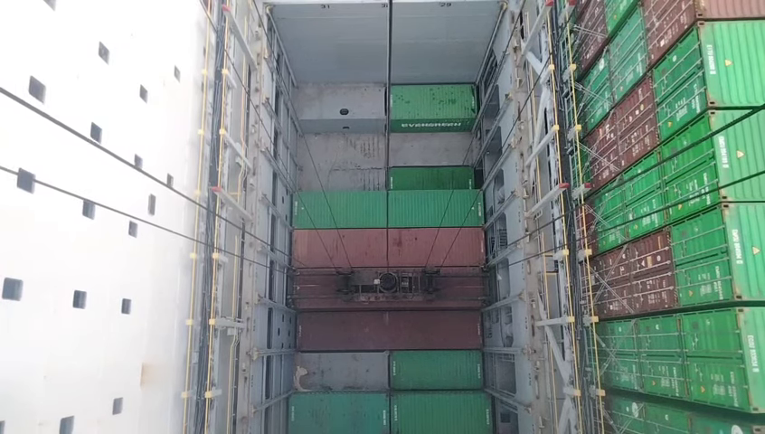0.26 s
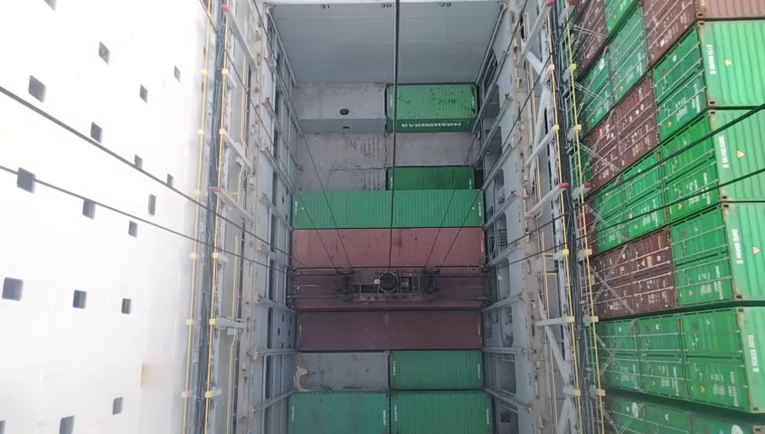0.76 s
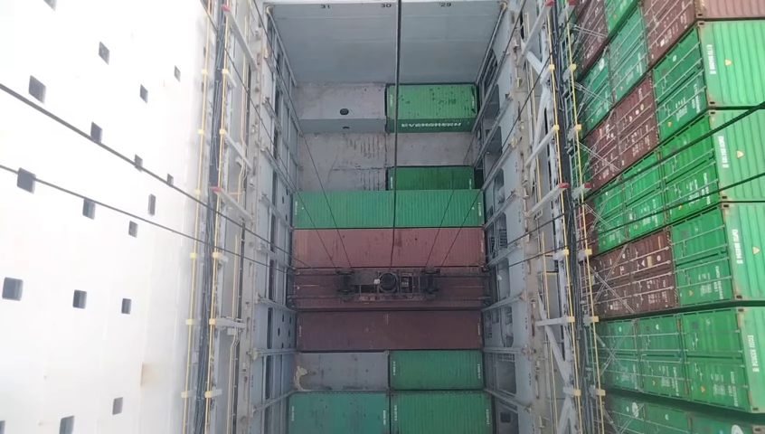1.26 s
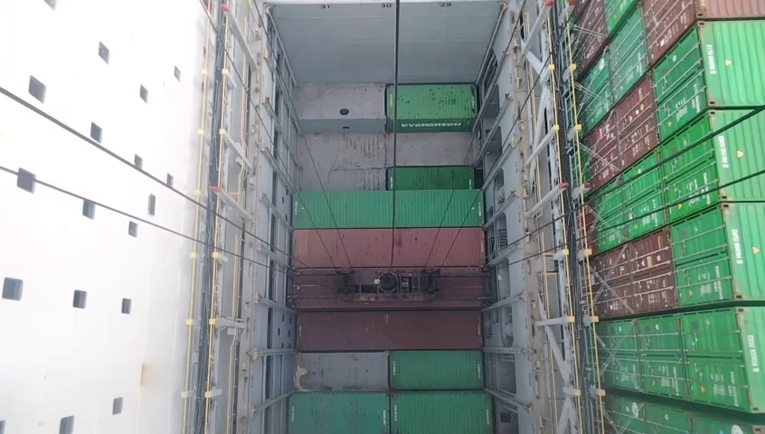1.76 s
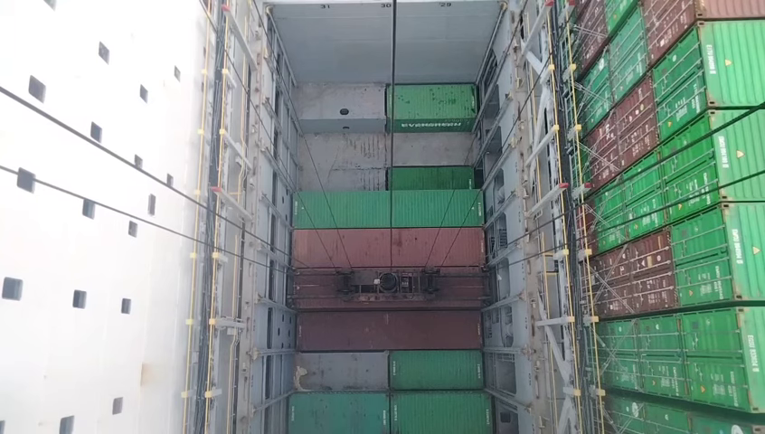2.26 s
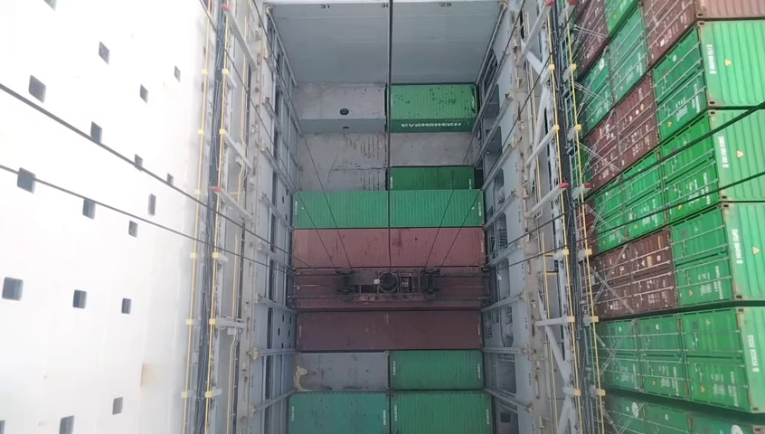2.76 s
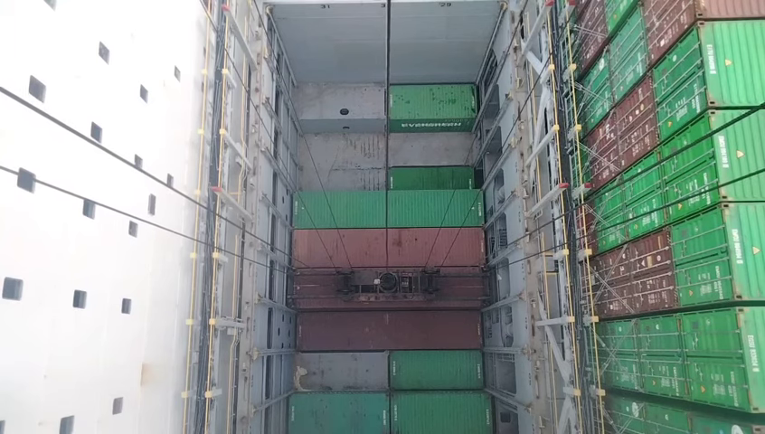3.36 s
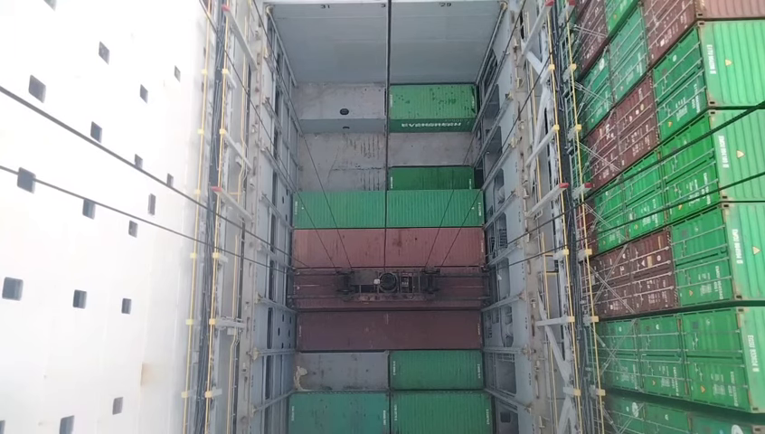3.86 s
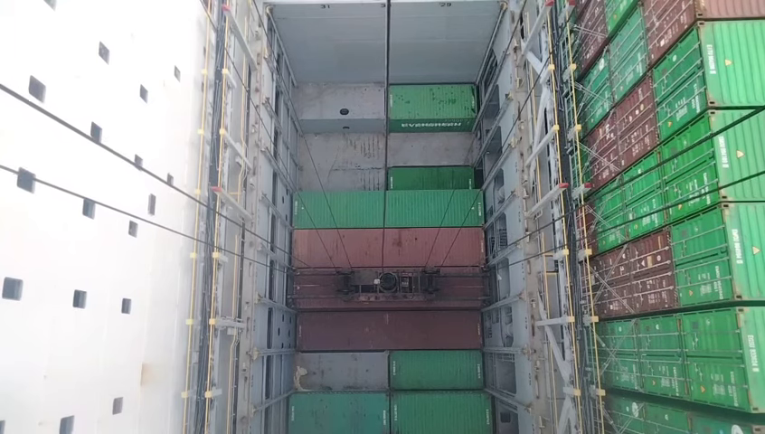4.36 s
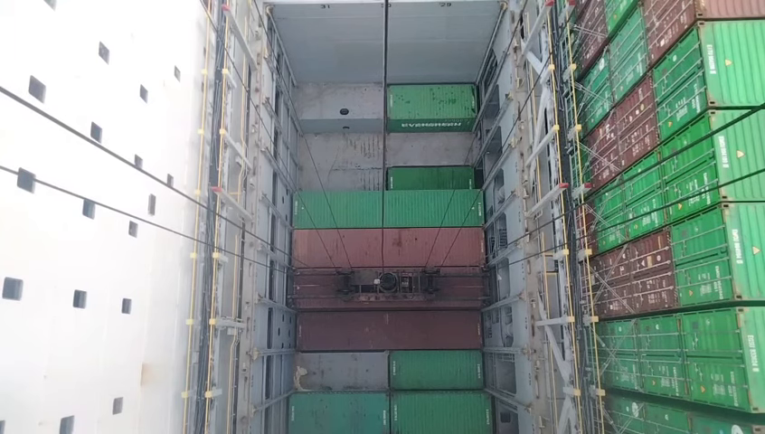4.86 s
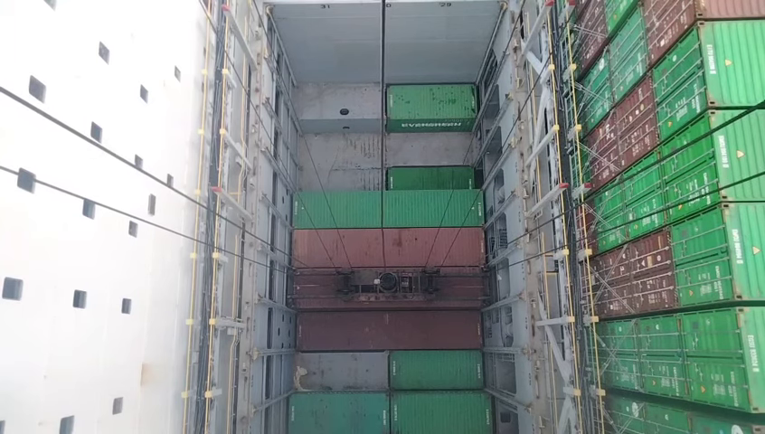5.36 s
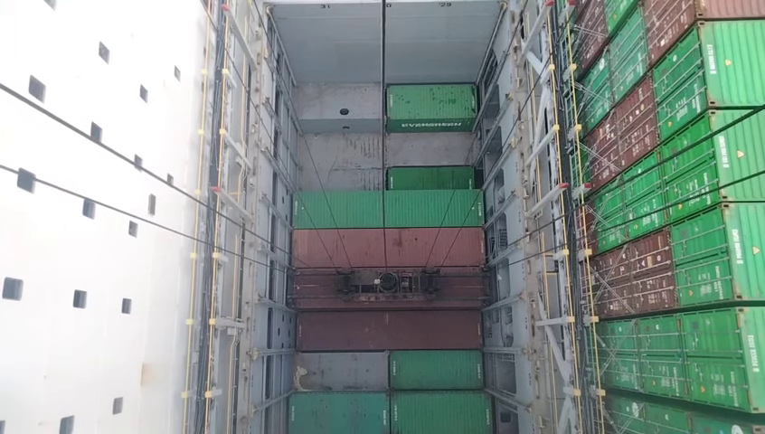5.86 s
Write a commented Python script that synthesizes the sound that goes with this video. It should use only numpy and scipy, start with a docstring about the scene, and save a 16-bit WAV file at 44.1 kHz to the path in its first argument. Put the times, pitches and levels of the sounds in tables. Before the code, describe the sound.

Inside a container crane's cab, a low throbbing machinery hum and rushing air continue while hoisting gear clacks in sharp metallic bursts and slams.

```python
"""A deep throb through the floor, a beating hum, a drive's whine and rushing air fill a container crane's cab.
Wavering sine tones make the machinery; coloured noise makes the air and the rumble.
Then the hoisting gear clacks in bursts: mostly a bright metal snap and then a duller knock of the housing,
with a few light pings and soft thumps between, and a catch that slams home. Each blow is a short chatter
of noise, shaped by the part that is struck; the small hard cab rings briefly after it."""
import sys
import numpy as np
from scipy import signal
from scipy.fft import rfft, irfft
from scipy.io import wavfile
from scipy.ndimage import uniform_filter1d

SR = 44100
rng = np.random.default_rng(int(sys.argv[2]) if len(sys.argv) > 2 else 0)


def generate_wav(sig):
    """Save sig (samples, or channels by samples) to the path in sys.argv[1] as 16-bit PCM at SR."""
    pcm = np.round(np.clip(np.atleast_2d(sig).T, -1, 1) * 32767).astype(np.int16)
    wavfile.write(sys.argv[1], SR, pcm)


N = 269892  # length of the scene in samples


def undb(db):
    """Turn decibels into a gain."""
    return 10 ** (np.asarray(db) / 20)


def unit(x):
    """Scale to rms 1."""
    return x / np.sqrt(np.mean(x ** 2))


def level_curve(rows):
    """Read a table of [t/s, level/dB] at every sample, with straight lines between the rows."""
    t, level_db = np.transpose(rows)
    return np.interp(np.arange(N) / SR, t, level_db)


def colour_db(points, hz):
    """Read a table of [f/Hz, level/dB] on a log-frequency axis."""
    f, db = np.transpose(points)
    return np.interp(np.log(hz + 1), np.log(f), db)


def walk(rate):
    """Drift at random: draw 'rate' levels a second, smooth the steps twice and scale to rms 1."""
    hold = int(SR / rate)
    steps = np.repeat(rng.standard_normal(N // hold + 1), hold)
    smooth = uniform_filter1d(uniform_filter1d(steps, hold), hold)
    return unit(smooth[:N])


def wavering_phase(hz, wander_hz):
    """Add up a speed that drifts around hz, from a random starting angle in radians."""
    turns = np.cumsum(hz + wander_hz * walk(9)) / SR
    return 2 * np.pi * (turns + rng.random())


def tone(hz, wander_hz, flutter_db):
    """A machine tone is a sine whose speed and strength waver; rms 1."""
    wave = np.sin(wavering_phase(hz, wander_hz))
    return unit(wave * undb(flutter_db * walk(12)))


def noise(points):
    """Noise takes its colour from a table that weights its spectrum; rms 1."""
    hz = np.fft.rfftfreq(N, 1 / SR)
    white = rfft(rng.standard_normal(N))
    return unit(irfft(white * undb(colour_db(points, hz)), N))


# Rush of air, relative colour: [f/Hz, level/dB per Hz]
AIR_COLOUR = [(150, -7), (330, 1), (600, -5.5), (850, -5), (1150, -10.5), (1450, -11), (1720, -11.5),
              (2050, -17.5), (3200, -25.5), (4500, -33.5), (7500, -33.5), (9300, -40), (11500, -45),
              (16000, -43)]
# Rumble of the steel structure, relative colour: [f/Hz, level/dB per Hz]
RUMBLE_COLOUR = [(10, -12), (32, -25), (55, 8), (76, -0.5), (115, 5.5), (140, -3), (240, -3.5), (300, -13),
                 (450, -22), (2000, -68)]


def ventilation():
    """Turbulent air is noise that wavers a little, over the low rumble of the steel structure."""
    rush = noise(AIR_COLOUR) * undb(-45.8 + 0.6 * walk(2.46) + 0.051 * walk(44))
    rumble = noise(RUMBLE_COLOUR) * undb(-45.0 + 0.17 * walk(3.75))
    return rush + rumble


# Weaker tones of motors and fans: [f/Hz, level/dB]
SMALL_TONES = [(22.4, -41.5), (29.6, -47.5), (45, -49.5), (90.2, -50), (102.5, -57.5), (119.5, -54),
               (164.5, -55.5), (179.3, -54), (200, -59), (224, -56), (239, -51), (308, -61.5), (358, -59.5),
               (402, -62.5), (454, -58), (726, -59.5), (5109, -86.5)]


def small_machines():
    """Each smaller motor or fan adds one wavering tone; higher tones wander by more Hz."""
    return sum(undb(db) * tone(hz, wander_hz=0.00307 * hz, flutter_db=1.66) for hz, db in SMALL_TONES)


SHUDDER_HZ = 24.2
# Throb of the floor, before a small trim: [t/s, level/dB]
SHUDDER_LEVEL = [(0.08, -35), (0.44, -43), (0.96, -32.5), (1.52, -43.5), (1.72, -38), (1.88, -47.5),
                 (2.16, -35.0), (2.68, -41.5), (2.88, -32.5), (3.72, -51), (4.12, -31.5), (4.68, -43),
                 (4.88, -31), (5.12, -43.5), (5.4, -35), (5.64, -50), (5.76, -42), (6.0, -35)]


def floor_shudder():
    """The floor shakes as a very low tone that swells and sinks."""
    level = undb(level_curve(SHUDDER_LEVEL) - 0.5)
    return level * tone(SHUDDER_HZ, wander_hz=0.52, flutter_db=-0.5)


# At LULL_S the two motors pull exactly against each other
HUM_HZ, HUM_DB, BEAT_HZ, LULL_S = 75.8, -40.5, 1.6, 0.36
# Second motor, which eases off and slowly comes back: [t/s, level/dB]
TWIN_LEVEL = [(0, -36.5), (.6, -37.5), (1.3, -38), (1.6, -61), (2.9, -52), (3.5, -49.5), (6.1, -42.5)]


def motor_hum():
    """Two motors hum, and the slightly slower twin beats against the first."""
    phase = wavering_phase(HUM_HZ, wander_hz=0.17)
    slip = 2 * np.pi * BEAT_HZ * (np.arange(N) / SR - LULL_S)
    first = undb(HUM_DB) * np.sin(phase)
    twin = undb(level_curve(TWIN_LEVEL)) * np.sin(phase - slip)
    return np.sqrt(2) * (first - twin)  # the root turns rms levels into peak levels


WHINE_HZ = 822.4
# Whine of the drive, before a trim: [t/s, level/dB]
WHINE_LEVEL = [(0, -74), (.95, -50.5), (2.3, -50.5), (3, -48.5), (4.9, -59.5), (6.1, -54)]


def drive_whine():
    """The drive sings one wavering tone that grows and fades."""
    level = undb(level_curve(WHINE_LEVEL) - 2.5)
    return level * tone(WHINE_HZ, wander_hz=1.6, flutter_db=1.0)


# Time for 60 dB of decay: bass and treble of the tail, and first reflections
LOW_T60_S, HIGH_T60_S, EARLY_T60_S = 0.23, 0.27, 0.11
# Pace at which the tail builds up, and level of the first reflections against the tail
BUILD_S, EARLY_DB = 0.006, 1


def cab(x, wet_db):
    """Close glass and steel walls give first reflections and a short dense tail, drawn anew for each blow."""
    t = np.arange(SR // 4) / SR

    def decay(t60):
        return np.exp(-np.log(1000) * t / t60)

    echoes = rng.standard_normal(len(t)) * np.clip(t / BUILD_S - .3, 0, 1)
    low = signal.lfilter(*signal.butter(1, 4000, fs=SR), echoes)
    tail = low * decay(LOW_T60_S) + (echoes - low) * decay(HIGH_T60_S)
    early = rng.standard_normal(len(t)) * decay(EARLY_T60_S)
    walls = undb(wet_db) * (unit(tail) + undb(EARLY_DB) * unit(early)) / np.sqrt(len(t))
    return signal.fftconvolve(x, signal.unit_impulse(len(t)) + walls)


def response(points, tilt_db, focus_hz, focus_db, size=2048):
    """A struck part colours the blow without delay; the spot that is hit favours one broad resonance."""
    hz = np.fft.rfftfreq(size, 1 / SR)
    resonance = focus_db * np.exp(-(np.log2((hz + 1) / focus_hz) / 0.2) ** 2)
    tilt = tilt_db * np.log2(np.maximum(hz, 1000) / SR)  # flat below 1 kHz
    # folding the cepstrum makes the response start at once (minimum phase)
    cepstrum = irfft(np.log(undb(colour_db(points, hz) + tilt + resonance)))
    cepstrum[1:size // 2] *= 2
    cepstrum[size // 2 + 1:] = 0
    return irfft(np.exp(rfft(cepstrum)))


def blows(table, colour, grit, focus_db, wet_db):
    """Each blow is a chatter of tiny contacts that swells and dies; grit makes the contacts more uneven."""
    out, t = np.zeros(N + SR), np.arange(SR // 5) / SR
    for s, db, rise_ms, tilt_db, focus_hz in table:
        age = t / (max(rise_ms, .2) / 1000)
        swell = age * np.exp(-age)
        strengths = np.exp(grit * rng.standard_normal(len(t)))
        contacts = rfft(rng.standard_normal(len(t)) * strengths * swell ** 2)
        # hard contacts push all frequencies nearly alike; most colour comes from the struck part
        evened = irfft(contacts / np.sqrt(np.abs(contacts) + 1e-12))
        force = evened * swell ** .25
        blow = signal.fftconvolve(force, response(colour, tilt_db, focus_hz, focus_db))
        # here db is the energy spread over a hundredth of a second, before the cab adds to it
        blow = undb(db) * blow * np.sqrt(SR / 100 / np.sum(blow ** 2))
        heard, start = cab(blow, wet_db), int(s * SR)
        out[start:start + len(heard)] += heard
    return out[:N]


def ringing(x, modes):
    """A struck part rings on at its own frequencies: a longer ring is a narrower resonance."""
    ring = 0
    for hz, t60, db in modes:
        width = np.log(1000) / (np.pi * t60)  # Hz
        ring = ring + undb(db) * signal.lfilter(*signal.iirpeak(hz, hz / width, fs=SR), x)
    return x + ring


# Colour of a small steel part: [f/Hz, level/dB per Hz]
PING_COLOUR = [(500, -4), (2500, -5), (5500, -13), (7200, -7), (7900, -8), (8500, -13), (9300, -21),
               (16000, -20)]
# Light pings: [t/s, level/dB, rise time/ms, tilt/dB per octave, favoured f/Hz]
PING_TIMES = [(2.359, -57.5, 3.4, 0, 7800), (2.835, -47.5, 4.1, -0.5, 7200)]


def pings():
    """A small steel part is struck lightly and answers high."""
    return blows(PING_TIMES, PING_COLOUR, grit=0.17, focus_db=6, wet_db=-3.0)


# Colour of the frame: [f/Hz, level/dB per Hz]
THUMP_COLOUR = [(40, 6), (100, 5), (160, -6), (300, 4.5), (550, -8), (1100, -5.5), (2200, -17.5),
                (3000, -21.5), (8000, -31), (16000, -61)]
# Soft thumps, before a trim: [t/s, level/dB, rise time/ms, tilt/dB per octave, favoured f/Hz]
THUMP_TIMES = [(3.505, -25.5, 17.7, -2, 153), (6.055, -29, 46, 1, 2480)]


def thumps(shakes):
    """The frame thumps softly by itself and also shakes with every clack."""
    rows = list(THUMP_TIMES) + shakes
    return undb(-3.0) * blows(rows, THUMP_COLOUR, grit=.1, focus_db=8.5, wet_db=-2.0)


# Colour of a knock, for the catch and the housing: [f/Hz, level/dB per Hz]
KNOCK_COLOUR = [(90, -19), (165, 9.5), (230, 1.5), (450, -7.5), (620, -3), (850, 4), (1000, 1.5), (1400, 5),
                (2600, -3), (4000, -7.5), (7800, -10), (9500, -23.5), (16000, -45)]
# The slam that ends the last rattle, before a trim and the ring:
# [t/s, level/dB, rise time/ms, tilt/dB per octave, favoured f/Hz]
SLAM_TIMES = [(4.530, -13.5, 4.9, 1.05, 3140)]
# Ring of the steel catch: [f/Hz, time for 60 dB of decay/s, level over the plain blow/dB]
CATCH_RING = [(1153, .18, 3), (1310, 0.15, 7), (1500, 0.1, -7), (1810, 0.081, 10), (1944, 0.093, -4),
              (2400, 0.066, 2), (3065, 0.11, -3), (3340, 0.14, -1), (4860, 0.018, 8)]


def catch_slam():
    """A steel catch slams home and rings."""
    plain = blows(SLAM_TIMES, KNOCK_COLOUR, grit=0.45, focus_db=10.5, wet_db=-5.5)
    return undb(-4) * ringing(plain, CATCH_RING)


# Ring of the housing: [f/Hz, time for 60 dB of decay/s, level over the plain blow/dB]
HOUSING_RING = [(169, 0.67, 14), (341, 0.34, 1), (726, .12, 9), (853, 0.26, 8.5), (1140, 0.2, -2),
                (1315, 0.19, 3), (1530, 0.066, 0.5), (1700, 0.15, -16), (1990, 0.14, -15), (2630, 0.033, 5)]


def housing_knocks(rows):
    """The housing knocks dully and rings on."""
    plain = blows(rows, KNOCK_COLOUR, grit=0.64, focus_db=4.0, wet_db=-3.5)
    return undb(-6.0) * ringing(plain, HOUSING_RING)


# Colour of a snap: [f/Hz, level/dB per Hz]
SNAP_COLOUR = [(100, -27), (600, 5), (1500, 3.5), (3500, 1), (6000, 6), (8000, 5), (11000, 0.5),
               (14000, -0.5), (16000, 7.5)]
# Ring of small steel parts: [f/Hz, time for 60 dB of decay/s, level over the plain blow/dB]
STEEL_RING = [(2410, 0.045, 11), (4650, 0.032, 3), (5160, 0.036, 0), (6150, 0.035, 3), (7800, 0.025, 0),
              (10800, 0.018, -2), (13800, .012, 4), (15800, .015, -18)]


def metal_snaps(rows):
    """Metal snaps brightly and the small steel parts ring."""
    plain = blows(rows, SNAP_COLOUR, grit=0.39, focus_db=5.5, wet_db=-3)
    return undb(-4.5) * ringing(plain, STEEL_RING)


# A crisp snap favours the top; a longer chatter is a softer contact and sounds lower
SNAP_TILT_DB, SNAP_HZ, CRISP_MS, SOFTENING = -1.5, 13600, 5.9, 0.39
# Knocks above the middling level are brighter, softer ones duller (dB per octave for each dB)
KNOCK_TILT_DB, MIDDLING_DB, BRIGHTENING = 0.53, -23, 0.13
# Every knock rebounds once, softer than itself, and every clack shakes the frame
REBOUND_S, REBOUND_DB = 0.022, -14
SHAKE_DB, SHAKE_RISE_MS, SHAKE_TILT_DB, SHAKE_HZ = -12.5, 24, 0, 165
# Clacks of the gear, levels before trims and rings: [t/s, snap level/dB, knock level/dB,
# delay of the knock/ms, rise time/ms, f that the knock favours/Hz]
CLACK_TIMES = [(1.433, -64.5, -38, -1, 5.8, 2120), (1.473, -48, -41, 1.5, 6.5, 6950),
               (1.518, -40.5, -35.5, 9.5, 6, 1490), (1.623, -31, -26, 18.5, 5.9, 1400),
               (1.697, -26.5, -19, 14, 6.2, 1400), (1.767, -24.5, -21.5, 13.5, 3.3, 1330),
               (1.841, -24, -20.5, 12, 6.4, 1640), (1.880, -52, -27, 2, 5.3, 790),
               (2.101, -40, -34, 1.5, 4, 1310), (2.139, -46, -30.5, 2, 3.7, 1310),
               (2.155, -26.5, -37, 3.5, 4.6, 2620), (2.190, -37.5, -30, 1, 8.7, 1280),
               (2.883, -32, -31, 8, 16.3, 1570), (3.490, -30, -42.5, 24, 23, 1000),
               (3.811, -62, -45, 3.5, 2.1, 4500), (4.210, -48, -26.5, 9.5, 7, 1200),
               (4.249, -29.5, -27.5, 2.5, 5.9, 1270), (4.301, -29, -29, 0, 6, 1500),
               (4.325, -21.5, -27, 9, 8, 2000), (4.336, -17.5, -18.5, 14, 6.3, 1070),
               (4.375, -19.5, -23.5, 0, 4.7, 1900), (4.419, -19.5, -21.5, 2.5, 3.9, 1200),
               (4.437, -29.5, -34, -1, 8.6, 1500), (4.469, -21, -26.5, 3, 6, 1400),
               (4.488, -25.5, -23.5, -0.5, 7.5, 2420), (4.519, -18.5, -21, 3, 5.6, 2000),
               (5.961, -54.5, -66, -3.5, 1.4, 6980)]


def clacks():
    """One clack of the gear is a snap, a knock close to it, a rebound and a shake of the frame."""
    snaps, knocks, shakes = [], [], []
    for s, snap_db, knock_db, lag_ms, rise_ms, knock_hz in CLACK_TIMES:
        snap_hz = SNAP_HZ * min(CRISP_MS / rise_ms, 1) ** SOFTENING
        snaps.append((s, snap_db, rise_ms, SNAP_TILT_DB, snap_hz))
        knock_s = s + lag_ms / 1000
        tilt_db = KNOCK_TILT_DB + BRIGHTENING * (knock_db - MIDDLING_DB)
        knocks.append((knock_s, knock_db, rise_ms, tilt_db, knock_hz))
        knocks.append((knock_s + REBOUND_S, knock_db + REBOUND_DB, rise_ms, tilt_db, knock_hz))
        shakes.append((s, knock_db + SHAKE_DB, SHAKE_RISE_MS, SHAKE_TILT_DB, SHAKE_HZ))
    return snaps, knocks, shakes


def scene():
    """The gear clacks in the cab over the machinery and the air."""
    background = ventilation() + small_machines() + floor_shudder() + motor_hum() + drive_whine()
    snap_rows, knock_rows, shake_rows = clacks()
    details = pings() + thumps(shake_rows) + catch_slam()
    gear = housing_knocks(knock_rows) + metal_snaps(snap_rows)
    return (background + details + gear)[None]


def record(dry):
    """A steep low-pass filter cuts the treble above 15.6 kHz."""
    return signal.sosfilt(signal.ellip(10, .2, 80, 15600, fs=SR, output="sos"), dry)


dry = scene()
out = record(dry)
generate_wav(out)
```